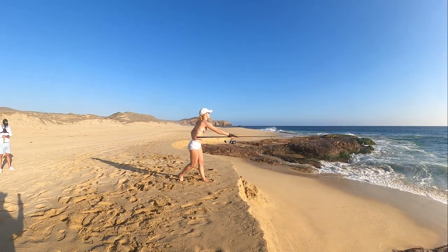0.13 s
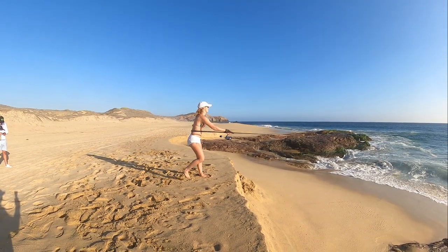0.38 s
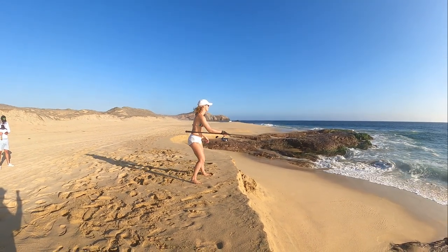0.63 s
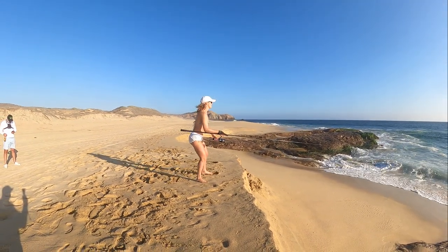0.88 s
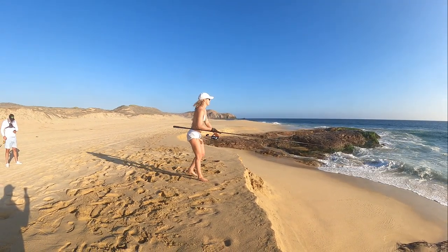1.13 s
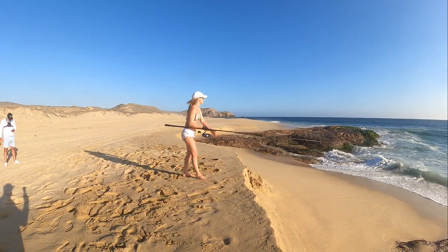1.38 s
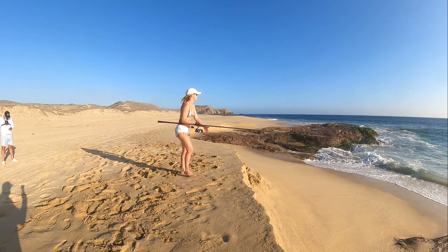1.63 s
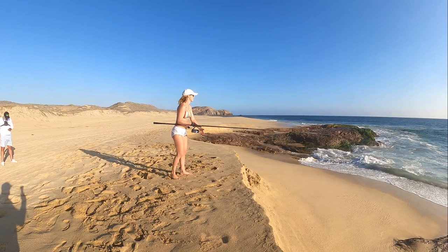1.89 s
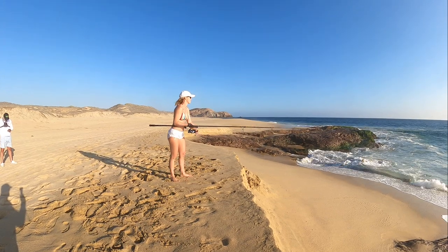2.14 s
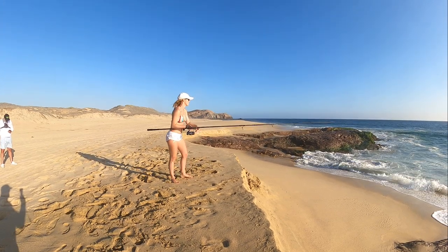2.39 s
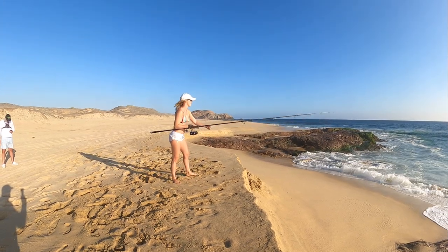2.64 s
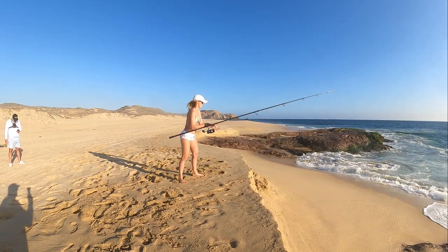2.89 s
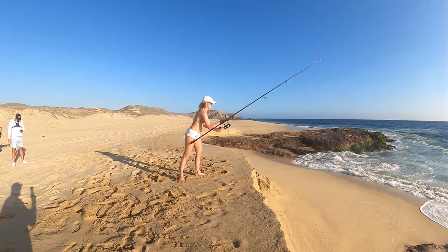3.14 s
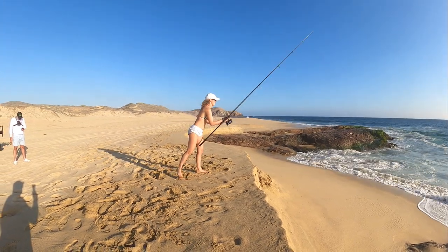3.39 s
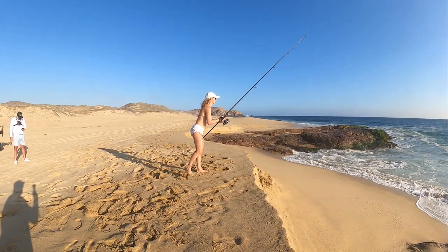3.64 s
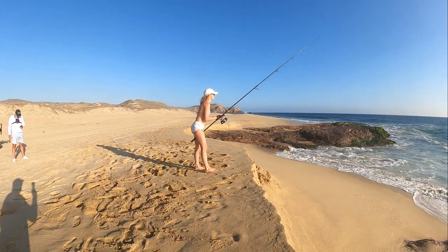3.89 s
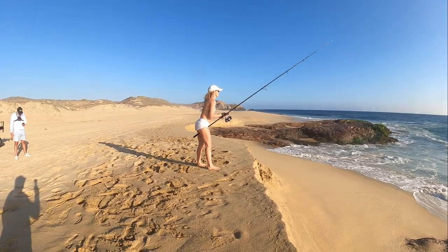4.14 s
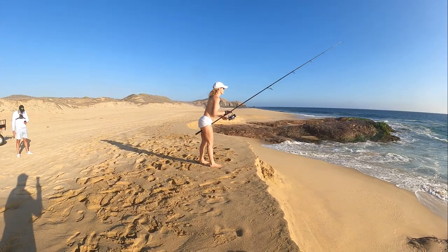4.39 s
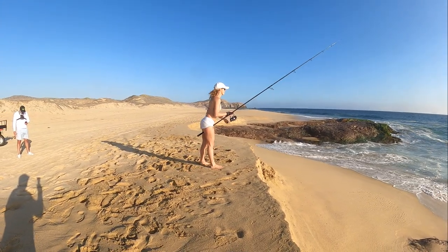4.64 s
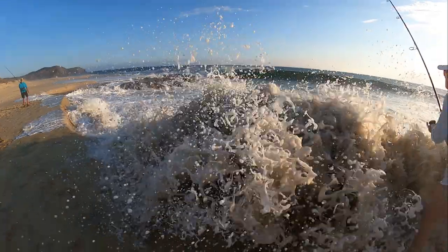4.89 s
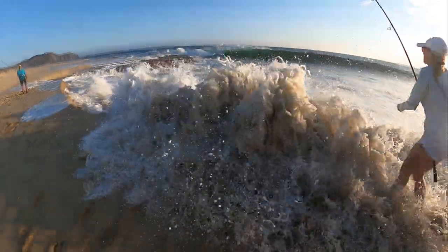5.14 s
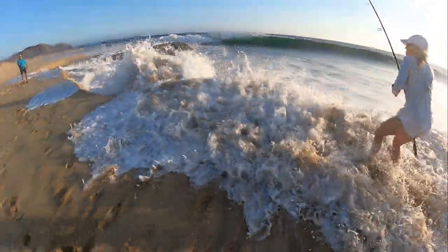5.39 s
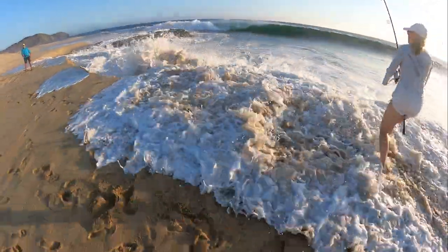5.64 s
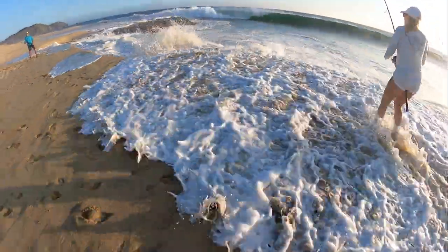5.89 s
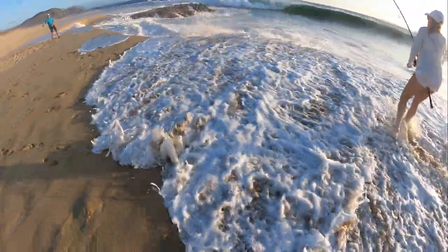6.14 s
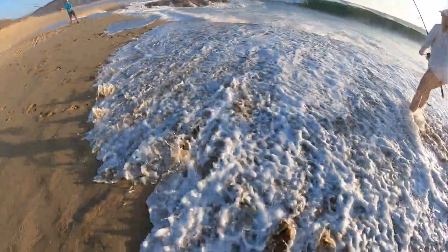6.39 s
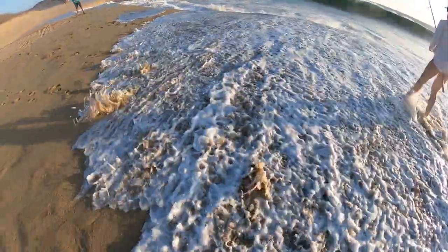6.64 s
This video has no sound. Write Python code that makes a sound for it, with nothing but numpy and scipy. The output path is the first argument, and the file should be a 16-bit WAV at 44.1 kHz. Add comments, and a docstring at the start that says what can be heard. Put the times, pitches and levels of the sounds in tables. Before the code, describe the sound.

Outdoors on a steep beach, surf heard from up the slope rushes continuously at moderate level, swelling around the middle and easing back. Two faint thin ticks and some dull low thumps touch the microphone. The sound stops abruptly for a moment, then fades in quickly as a much louder, close wave, churning and bubbling with bright foam and a heavy bump.

```python
"""Surf on a steep sandy beach: from up the slope, then, after a short silence, from the water's edge.
The sea is random bursts and noise in overlapping bands that follow tabled levels, with short lifts and dips.
Bubbles ring as short sines in the wash and the foam; dull thumps of wind or water push the microphone.
Two thin high ticks sound in the first part. A mid and a side signal make left and right."""
import sys
import numpy as np
from scipy import signal
from scipy.fft import rfft, irfft, next_fast_len
from scipy.io import wavfile
from scipy.ndimage import uniform_filter1d

SR = 44100
rng = np.random.default_rng(int(sys.argv[2]) if len(sys.argv) > 2 else 0)


def linear_from_db(decibels):
    """Turn decibels (scalar or array-like) into linear amplitude factors; 0 gives 1."""
    return 10 ** (np.asarray(decibels, float) / 20)


def bounce(signal):
    """Save signal as a 16-bit WAV file at the path given by the first command-line argument."""
    frames = np.transpose(np.atleast_2d(signal))
    limited = np.clip(frames, -1, 1)
    pcm = np.round(limited * 32767).astype(np.int16)
    wavfile.write(sys.argv[1], SR, pcm)


N = 298097
NEAR_FROM_S = 5

# short lifts and dips of level around one frequency: splashes, surges,
# a resonance sinking from 930 to about 750 Hz:
# (time [s], lift or, if negative, dip [dB], centre [Hz], decay to 1/e [s])
LIFTS_AND_DIPS = [(.272, 5, 1200, .015), (1.2, 1, 300, .08), (5.18, 3, 4000, .1), (.03, 1, 3500, .08),
                  (1.36, 5, 500, 0.059), (1.86, 8, 537, .04), (2.08, 9, 3600, 0.054),
                  (2.08, 4.5, 5500, .07), (2.09, 1, 2000, .06), (2.105, 10, 1110, 0.041),
                  (2.215, 6, 1600, .03), (2.3, 2, 6030, 0.037), (2.37, 5, 600, 0.026), (2.5, 1, 3200, 0.06),
                  (2.53, 1, 1500, .08), (2.75, 2.5, 3000, 0.065), (3.05, -1, 2000, .08),
                  (2.62, 4, 250, 0.045), (2.72, 3.5, 500, 0.08), (2.85, -3, 250, .04),
                  (2.98, 4, 330, 0.028), (3.0, 4, 704, .05), (3.375, 7, 587, 0.027), (3.75, 4.5, 1790, .04),
                  (4.0, 3, 500, 0.057), (5.16, 3.5, 200, 0.091), (5.17, 1.5, 2200, 0.041),
                  (5.19, 6.5, 930, 0.1), (5.28, 6.5, 930, 0.12), (5.45, 3, 750, 0.046),
                  (5.51, 9, 786, 0.053), (5.72, 5.5, 950, .05), (6.13, 4, 320, 0.056),
                  (6.27, 1, 330, 0.039), (6.1, -4.5, 3000, .06), (6.42, 1.5, 3500, 0.074),
                  (6.45, 3, 1200, 0.035), (6.67, 10.5, 180, 0.055)]


def rms_one(x):
    """Scaled to rms 1."""
    return x / np.sqrt(np.mean(x ** 2) + 1e-20)


def in_time(rows):
    """Table columns interpolated at every sample."""
    s, *columns = np.transpose(rows)
    return np.array([np.interp(np.arange(N) / SR, s, column) for column in columns])


def at_hz(points, hz):
    """A spectrum in dB read on a log-frequency axis."""
    points_hz, points_db = np.transpose(points)
    return np.interp(np.log(hz), np.log(points_hz), points_db)


def drift(pole_hz):
    """Slow chance: noise at SR / 40 through a double one-pole low-pass, scaled to rms 1."""
    r = np.exp(-2 * np.pi * pole_hz * 40 / SR)
    noise = rng.standard_normal(N // 40 + 2002)
    slow = signal.lfilter([1], [1, -2 * r, r * r], noise)[2000:]
    return np.interp(np.arange(N) / 40, np.arange(len(slow)), rms_one(slow))


def ring(clicks, hz, t60_s):
    """Two-pole resonator: a unit click starts a sine of height 1 that falls 60 dB in t60_s."""
    r, w = linear_from_db(-60 / (t60_s * SR)), 2 * np.pi * hz / SR
    return signal.lfilter([0, np.sin(w)], [1, -2 * r * np.cos(w), r * r], clicks + 1e-18)


def surf(levels_db, colour, span_s, shared_db, patchy_db):
    """Collapsing air pockets: 22 noise bands, each following the nearest voices, lifts, dips and chance."""
    # limits of the seven voices: (low [Hz], high [Hz])
    voice_limits_hz = [(25, 120), (120, 400), (400, 1200), (1200, 2800), (2800, 5500), (5500, 8800),
                       (9200, 14800)]
    # stereo width: (frequency [Hz], side against mid [dB])
    side_ratio = [(30, -28), (60, -33.5), (200, -49), (400, -44), (1000, -39), (2300, -33.5), (4000, -28.5),
                  (8300, -16.5), (9000, -41), (11200, -22.5), (12000, -1), (14500, -1.5)]
    part = slice(round(span_s[0] * SR), round(span_s[1] * SR))
    size = next_fast_len(part.stop - part.start)
    hz = np.maximum(np.arange(size // 2 + 1) * SR / size, 1)
    shape = linear_from_db(at_hz(colour, hz))
    bursts = bursting(per_s=2500, spread_db=3.0, share=0.08)[part]
    mid = rfft(bursts, size) * shape
    side = rfft(rng.standard_normal(size)) * shape * linear_from_db(at_hz(side_ratio, hz))
    spectra = np.array([mid, side])

    # voice levels relative to what the colour already holds in each voice
    power = [2 * np.sum(shape[(hz > low) & (hz < high)] ** 2) / size for low, high in voice_limits_hz]
    swell_db = levels_db[:, part] - 10 * np.log10(power)[:, None]
    middles = np.log([np.sqrt(low * high) for low, high in voice_limits_hz])
    centres = np.linspace(np.log(40), np.log(14000), 22)
    change_hz = np.array(LIFTS_AND_DIPS)[:, 2]
    changes_db = lifts_and_dips()[:, part]
    together = drift(pole_hz=24.0)[part]
    out = np.zeros((2, N))
    for k, centre in enumerate(centres):
        # the windows add up to one
        window = np.interp(np.log(hz), centres, np.arange(len(centres)) == k)
        weights = np.array([np.interp(centre, middles, row) for row in np.eye(len(middles))])
        octaves_off = np.log2(np.exp(centre) / change_hz)
        near = np.exp(-(octaves_off / 0.4) ** 2)
        flicker_db = patchy_db + 0.27 * (centre > np.log(3000))
        chance_db = shared_db * together + flicker_db * drift(pole_hz=7.0)[part]
        gain = linear_from_db(weights @ swell_db + near @ changes_db + chance_db)
        out[:, part] += gain * irfft(window * spectra, size)[:, :len(gain)]
    return out


def voices(sea, rule):
    """Each voice takes its shares of the swings of the five sea levels about their means."""
    rule = np.array(rule)
    means_db = np.mean(np.array(sea)[:, 1:], axis=0)
    swings_db = in_time(sea) - means_db[:, None]
    return rule[:, :1] + rule[:, 1:] @ swings_db


def bursting(per_s, spread_db, share):
    """White excitation: a smooth mass of far bubbles plus single bursts of uneven size."""
    sizes = linear_from_db(spread_db * np.minimum(rng.exponential(1, N), 5)) * rng.choice([-1, 1], N)
    bursts = rms_one(sizes * (rng.random(N) < per_s / SR))
    share = np.clip(share, 0, 1)  # of the power
    return np.sqrt(1 - share) * rng.standard_normal(N) + np.sqrt(share) * bursts


def lifts_and_dips():
    """Each level change over time [dB]: a quick onset, then a dying away."""
    onset_s = 0.006
    change_s, change_db, _, decay_s = np.transpose(LIFTS_AND_DIPS)[:, :, None]
    late_s = np.arange(N) / SR - change_s
    return change_db * np.exp(-np.where(late_s < 0, (late_s / onset_s) ** 2, late_s / decay_s))


def plops(level_db, per_s, low_hz, high_hz, cycles):
    """Bubbles of uneven size ring at 16 pitches between two limits, falling 60 dB in some cycles."""
    sizes = linear_from_db(5.8 * np.minimum(rng.exponential(1, N), 3)) * (rng.random(N) < per_s / SR)
    pitches_hz = np.geomspace(low_hz, high_hz, 16)
    dealt = rng.integers(0, 16, N)
    rings = sum(ring(sizes * (dealt == k), hz, cycles / hz) for k, hz in enumerate(pitches_hz))
    softened = signal.lfilter([.1], [1, -.9], rings)
    return linear_from_db(level_db) * rms_one(softened)


def bumps():
    """Each puff presses the diaphragm in once and lets it swing back."""
    # dull thumps of wind or water: (time [s], peak before the microphone [dB], frequency [Hz])
    thumps = [(2.36, -14, 260), (4.668, -20, 70), (4.701, -25, 170), (4.768, -24, 85), (4.855, -20, 150),
              (4.865, -20, 138), (5.456, -8.5, 200), (5.718, -19, 85), (5.799, -15, 120)]
    t_s, out = np.arange(N) / SR, np.zeros(N)
    for s, db, hz in thumps:
        cycles = (t_s - s) * hz
        out -= linear_from_db(db) * np.exp(-(cycles / 0.5) ** 2) * np.cos(2 * np.pi * cycles)
    return out


def ticks():
    """Very short rings at 13.5 kHz, a little to one side."""
    # thin high ticks: (time [s], height of the mid ring before decay [dB])
    tick_rows = [(1.6327, -38.5), (2.3376, -40)]
    clicks = np.zeros(N)
    for s, db in tick_rows:
        clicks[round(s * SR)] = linear_from_db(db)
    return ring(clicks, 13500, t60_s=.004) * np.array([[1], [.6]])


def flicker(side):
    """The side is split near 10 kHz: the low part switches on and off by chance, the top follows a table."""
    # low part while on: (time [s], gain [dB])
    low_gain = [(0, 1), (5.0, 1), (5.1, -14), (5.7, -14), (5.75, 6), (6.76, 6)]
    # top part, narrow after the silence and then opening: (time [s], gain [dB])
    top_gain = [(0, 0), (5.0, 2), (5.05, -21), (5.66, -17), (5.95, 3.5), (6.76, 5)]
    on = (drift(pole_hz=4.0) > .2) * linear_from_db(in_time(low_gain)[0])
    low = signal.sosfilt(signal.cheby2(10, 50, 10500, fs=SR, output="sos"), side)
    top = signal.sosfilt(signal.cheby2(10, 50, 9500, "high", fs=SR, output="sos"), side)
    return low * uniform_filter1d(on, size=400) + top * linear_from_db(in_time(top_gain)[0])


def scene():
    """Sea, bubbles, thumps and ticks add up in mid and side, which make left and right."""
    # sea colour from up the slope and from the water's edge: (frequency [Hz], relative density [dB per Hz])
    far_colour = [(12, -41), (20, -16), (48, -13.5), (113, -8.5), (181, -4), (225, -3.5), (266, -2.5),
                  (402, -5), (591, -1.5), (1390, -9.5), (3640, -20), (7040, -35), (9270, -47), (10300, -50),
                  (14400, -56)]
    near_colour = [(12, -59), (20, -32), (86, -8.5), (149, -5.5), (281, -3.5), (487, -9.5), (678, -4),
                   (970, -7), (2040, -4), (4290, -14.5), (6660, -28), (7860, -35), (9020, -50.5),
                   (10300, -41.5), (12300, -47), (12900, -45), (14400, -48)]
    # sea levels, used as swings about their means:
    # (time [s], rumble [dB], roar [dB], wash [dB], rush [dB], treble [dB])
    far_sea = [(0, -45, -26, -29, -31.5, -35.5), (.2, -37, -32, -33.5, -30.5, -39.5),
               (.35, -44, -29.5, -29.5, -32, -40.5), (.45, -43, -29.5, -31.5, -32, -41.5),
               (.55, -33.5, -33, -30, -33.5, -43), (.67, -37, -30, -32.5, -34, -46.5),
               (.85, -41, -33.5, -33, -33, -44.5), (1.15, -39, -32, -32, -35, -45),
               (1.35, -48, -28, -32.5, -34.5, -44.5), (1.6, -35.5, -35, -33, -35.5, -46.5),
               (2.06, -36.5, -31.5, -34, -36, -46.5), (2.15, -41, -32.5, -31.5, -33, -45.5),
               (2.3, -41.5, -32, -31, -31.5, -42.5), (2.47, -40, -29, -30, -30.5, -43),
               (2.53, -43, -28, -27.5, -27, -41), (2.72, -39, -24.5, -25.5, -27.5, -40.5),
               (2.87, -41.5, -30.5, -26.5, -27.5, -39), (2.97, -43, -23.5, -29, -26.5, -39.5),
               (3.17, -44.5, -28, -27, -27, -41), (3.27, -46, -26, -29, -31, -42),
               (3.45, -39.5, -30.5, -31, -32, -43.5), (3.65, -42, -31.5, -30.5, -34.5, -44.5),
               (3.78, -35, -32, -29.5, -34.5, -43), (3.9, -43, -30, -31, -36.5, -44.5),
               (4.06, -37.5, -29, -30.5, -36.5, -46), (4.15, -47, -30, -35.5, -36.5, -47.5),
               (4.55, -47, -31, -35.5, -36.5, -47.5), (4.86, -43, -30, -32.5, -37.5, -49)]
    near_sea = [(5.17, -26, -20.5, -22.5, -20, -35), (5.26, -31, -20, -25, -20, -34.5),
                (5.35, -23, -17, -24.5, -20.5, -34), (5.46, -50, -18, -22, -22.5, -37),
                (5.55, -34, -20.5, -23.5, -21, -35.5), (5.63, -34, -26, -22, -22, -33),
                (5.76, -28, -24, -23.5, -22.5, -33.5), (5.86, -39, -26.5, -22, -24, -33),
                (5.97, -41, -24, -24, -25.5, -34), (6.05, -33, -23, -24, -25, -34.5),
                (6.15, -39, -22, -22.5, -24, -34.5), (6.37, -38, -23, -23.5, -24, -36),
                (6.46, -30, -20, -19.5, -22.5, -34), (6.56, -30.5, -23.5, -23.5, -22.5, -34.5),
                (6.67, -37, -23.5, -22.5, -23, -33.5), (6.76, -32.5, -25.5, -23.5, -25, -32)]
    # rows rumble, roar, wash, rush, foam, fizz, spray: (mean level [dB],
    # share of the swing of rumble [dB/dB], of roar [dB/dB], of wash [dB/dB], of rush [dB/dB], of treble [dB/dB])
    far_rule = [(-43, 0.94, 0.092, 0.075, -0.12, 0), (-28.5, 0.15, 0.85, 0.05, 0.096, 0),
                (-32, 0, 0, 0.83, 0.057, 0), (-35, 0.11, 0.2, 0.12, 1, 0), (-35.5, 0, 0, 0.2, 0.46, 0.48),
                (-45, 0.14, 0.2, 0.023, -0.11, 0.97), (-62, 0, 0.06, 0, 0.15, 0.62)]
    near_rule = [(-38.5, 1, 0, 0, 0, 0.07), (-21.5, 0, 0.99, 0.064, 0.17, 0.091),
                 (-24.5, 0.011, 0.069, 0.87, -0.018, 0), (-27, 0.012, 0.3, 0, 0.82, 0),
                 (-27, 0, 0.078, 0.098, 1, 0.9), (-34.5, 0.035, 0.2, 0, -0.58, 0.94),
                 (-59, 0, 0, 0.083, -.5, .8)]
    far_db, near_db = voices(far_sea, far_rule), voices(near_sea, near_rule)
    sea = surf(far_db, far_colour, (0, NEAR_FROM_S), shared_db=0.35, patchy_db=0.6)
    sea += surf(near_db, near_colour, (NEAR_FROM_S, N / SR), shared_db=0.4, patchy_db=0.82)
    is_far = np.arange(N) < NEAR_FROM_S * SR
    wash_db = np.where(is_far, far_db[2], near_db[2])
    foam_db = np.where(is_far, far_db[4], near_db[4])
    sea[0] += plops(wash_db - 9.5, per_s=200, low_hz=260, high_hz=1500, cycles=29.0)
    sea[0] += plops(foam_db - 7.0, per_s=600, low_hz=1200, high_hz=6200, cycles=22.0)
    sea[0] += bumps()
    mid, side = sea + ticks()
    side = flicker(side)
    return np.array([mid + side, mid - side])


def top_edge(x):
    """A steep low-pass whose edge moves, made by blending seven fixed edges."""
    # top of the treble: (time [s], edge of the 40 dB stop band [Hz])
    edge_rows = [(0, 15050), (5.0, 14860), (5.1, 13000), (5.26, 13600), (5.72, 13800), (5.8, 14550),
                 (5.92, 14900), (6.76, 15200)]
    edges_hz = np.linspace(12800, 15200, 7)
    edge_hz = in_time(edge_rows)[0]
    cut = [signal.sosfilt(signal.cheby2(12, 40, hz, fs=SR, output="sos"), x) for hz in edges_hz]
    weights = [np.interp(edge_hz, edges_hz, row) for row in np.eye(len(edges_hz))]
    return sum(w * y for w, y in zip(weights, cut))


def notch(x):
    """A narrow gap in the treble, sheer below and sloping above."""
    notch_hz, width_hz, depth_db = 8880, 200, -30
    size = next_fast_len(N)
    hz = np.arange(size // 2 + 1) * SR / size
    gap_db = depth_db * (hz > notch_hz) * np.exp(-((hz - notch_hz) / width_hz) ** 2)
    return irfft(rfft(x, size) * linear_from_db(gap_db), size)[:, :N]


def roll_off(x):
    """The treble ends steeply here."""
    return signal.sosfilt(signal.butter(12, 14980, fs=SR, output="sos"), x)


def record(dry):
    """The microphone rounds peaks and passes no steady pressure; the sound stops and fades back in."""
    cut_s, cut_fade_s, return_s, return_fade_s = 4.8681, .0004, 5.091, .068
    t_s = np.arange(N) / SR
    rounded = 0.91 * np.tanh(dry / 0.89)
    treble_shaped = notch(top_edge(rounded))
    heard = signal.sosfilt(signal.butter(2, 22, "high", fs=SR, output="sos"), treble_shaped)
    before = np.clip((cut_s - t_s) / cut_fade_s, 0, 1)
    after = np.clip((t_s - return_s) / return_fade_s, 0, 1) ** 1.4
    return roll_off(heard * (before + after))


dry = scene()
out = record(dry)
bounce(out)
```